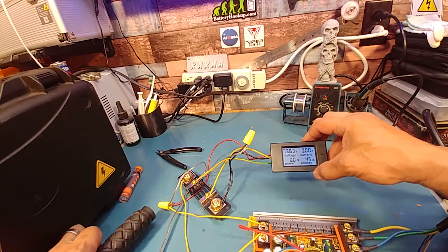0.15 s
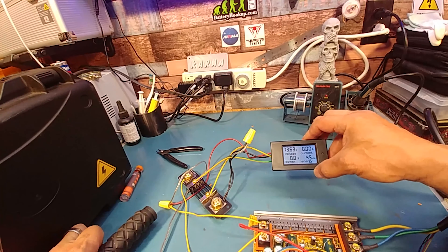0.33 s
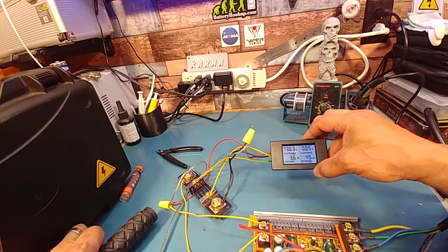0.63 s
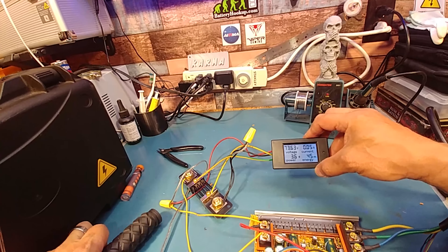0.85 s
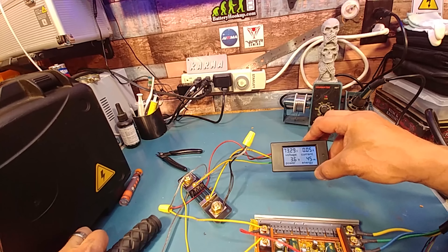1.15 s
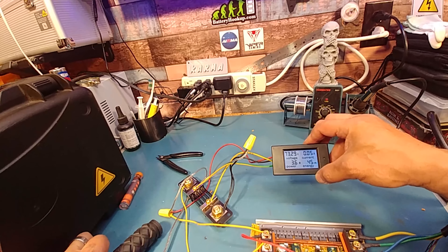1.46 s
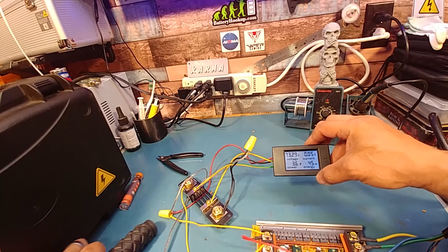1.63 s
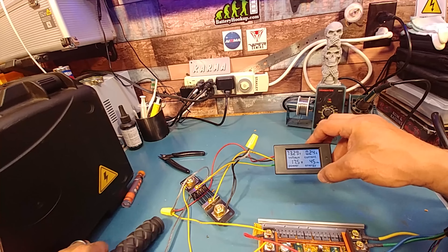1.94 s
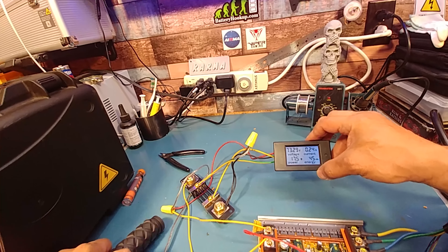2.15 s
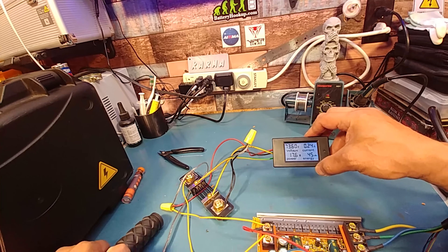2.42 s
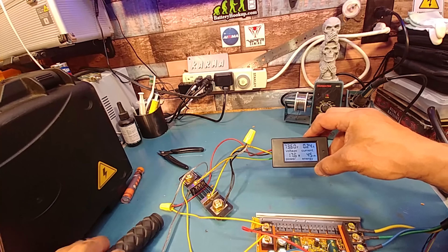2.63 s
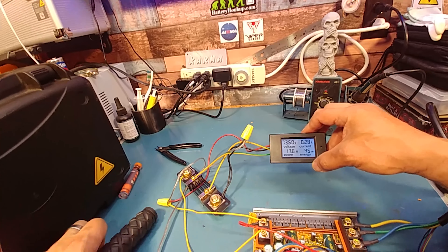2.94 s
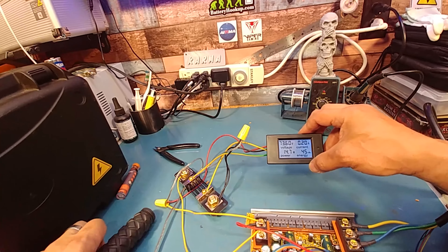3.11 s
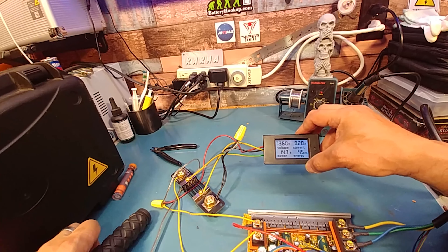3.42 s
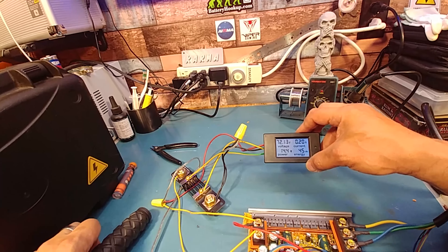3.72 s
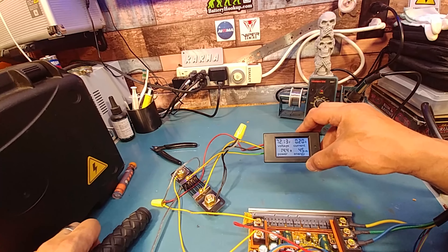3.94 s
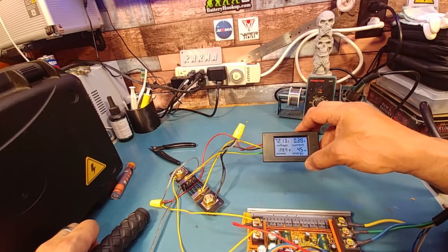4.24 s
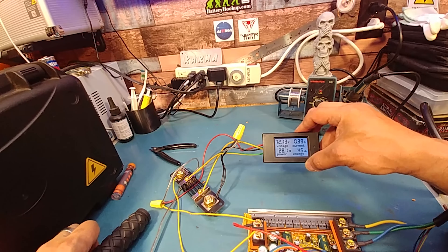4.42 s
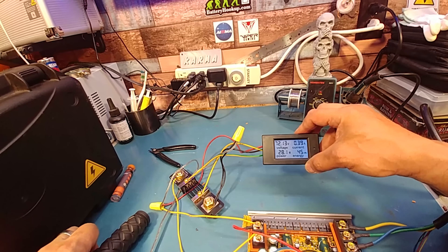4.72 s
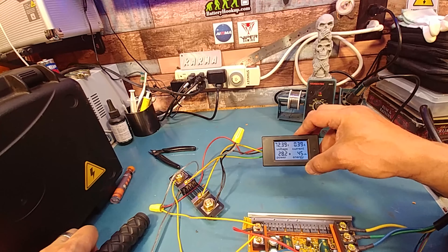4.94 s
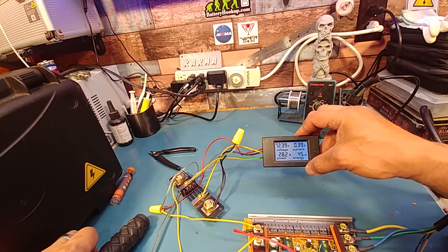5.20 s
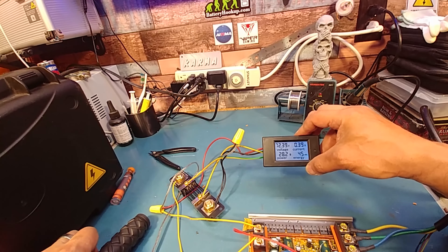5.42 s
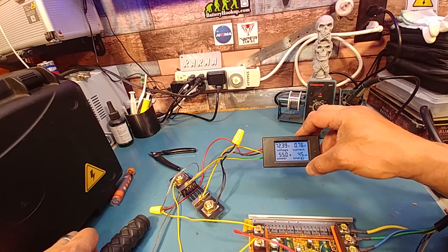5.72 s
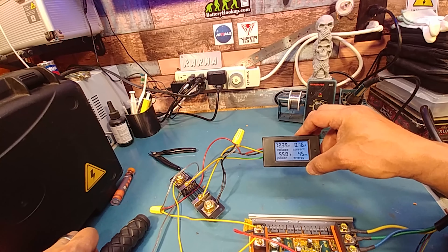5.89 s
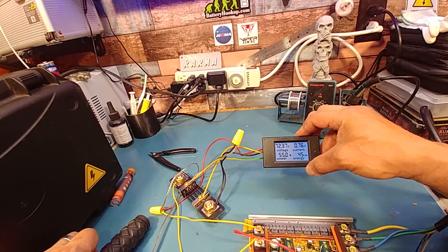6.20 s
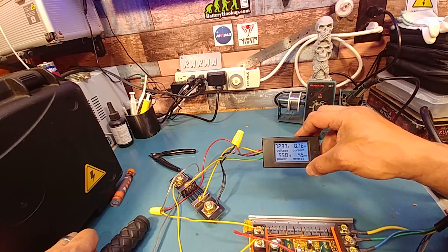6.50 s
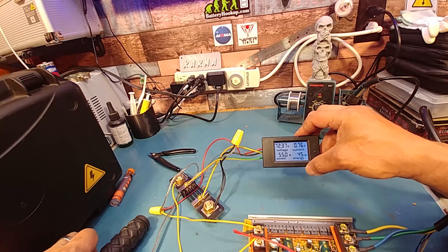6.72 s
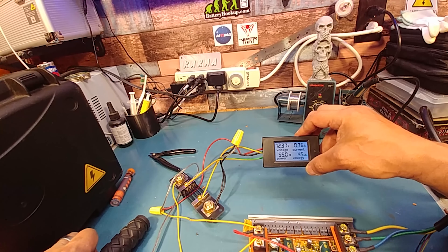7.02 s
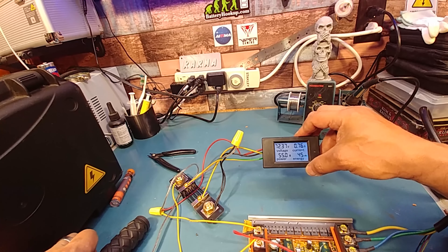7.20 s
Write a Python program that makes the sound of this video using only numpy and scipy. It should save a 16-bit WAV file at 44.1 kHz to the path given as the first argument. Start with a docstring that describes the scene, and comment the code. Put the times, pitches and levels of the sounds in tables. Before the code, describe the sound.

Low room tone opens the scene, heard in close stereo at a workbench. At about 0.5 seconds an electric hub motor gives a small snap and starts turning a lifted wheel, with a groan, a rasping, rising whine and a thin, very high whistle. At 1.5 seconds it steps up in pitch, a deep hum comes through the bench and the stand begins to rattle. At 2.2 seconds the power cuts and the wheel coasts down, with faint ticks and two dull knocks near 2.3 and 2.7 seconds, stopping just after 3 seconds. At 3.3 seconds another snap starts a fast upward sweep with a short shudder. From about 4 seconds the motor holds full speed, a loud, steady, multi-tone whine over a deep hum and the rush of bearings and tyre, until the end at about 7.5 seconds.

```python
"""At a workbench, close on a stereo pair: an electric hub motor spins a lifted wheel through two steps of
throttle, a coast to rest, then full speed. The rotor shakes the bench with a deep hum, magnetic ripple
whines in the housing, the commutation rasps and the controller's switching tone whistles at the top,
with sidebands that follow the speed. Bearings and tyre rush, the stand rattles and the frame knocks,
all over low room tone."""
import sys
import numpy as np
from scipy import signal
from scipy.fft import rfft, irfft, next_fast_len
from scipy.io import wavfile

SR = 44100
rng = np.random.default_rng(int(sys.argv[2]) if len(sys.argv) > 2 else 0)


def store_wav(level_fs):
    """Save 16-bit WAV to argv[1]."""
    pcm = np.round(np.clip(np.atleast_2d(level_fs), -1, 1) * 32767)
    wavfile.write(sys.argv[1], SR, pcm.T.astype(np.int16))


N = 324135

FULL_HZ = 119.35  # top speed; `speed` is the electrical rate in Hz, `turn` counts its cycles
# phase by which the left microphone leads the right: f/Hz, lead/rad
MIC_LEAD = [(30, -.1), (65, -.2), (119, -.3), (300, -.6), (600, -1.4), (1200, -1.6), (2800, -2.2),
            (5000, -1.5), (15000, -1.6)]
# spans in which the controller drives the windings: on t/s, off t/s
THROTTLE_SPANS = [(.53, 2.2), (3.29, 7.5)]
# spectrum of the bench's lowest mode: f/Hz, level/dB
BENCH_SPECTRUM = [(20, -31), (45, -14), (58, -4.5), (66, 2.5), (80, -22), (130, -14.5), (250, -31),
                  (1000, -92)]


def from_db(db):
    """Decibels as amplitude gain."""
    return 10 ** (np.asarray(db) / 20)


def rms_one(x):
    """The signal scaled to rms 1."""
    return x / np.sqrt(np.mean(x ** 2) + 1e-20)


def at_hz(points, hz):
    """A curve read off straight lines over log frequency."""
    knots, values = np.transpose(points)
    return np.interp(np.log(hz + 1e-3), np.log(knots), values)


def resonance(hz, centre_hz, half_width_hz):
    """Gain of a resonance, 1 on top."""
    return 1 / (1 + ((hz - centre_hz) / half_width_hz) ** 2)


def drift(rate_hz):
    """A slow random wander through points of spread 1."""
    count = int(N / SR * rate_hz * 2) + 3
    return np.interp(np.linspace(0, count - 1, N), np.arange(count), rng.standard_normal(count))


def white():
    """Two unrelated white noises."""
    return rng.standard_normal((2, N))


def coloured(pair, colour):
    """Two unrelated signals become one sound at the microphones, shaped by a spectrum; rms 1."""
    # how alike the two microphones sound: f/Hz, coherence/0-1
    coherence = [(100, 0.86), (300, 1), (700, 0.25), (1500, 0.9), (3000, 0.38), (6000, 0.053), (15000, .2)]
    # balance of the pair: f/Hz, left over right/dB
    balance = [(100, 1.5), (300, 0), (700, -3), (1500, -1), (3000, -1), (4500, -3.5), (6000, -4),
               (7600, 1.5), (10000, -.5), (13500, 4), (15500, 2)]
    size = next_fast_len(N + 4096)
    hz = np.arange(size // 2 + 1) * SR / size
    mid, side = rfft(pair, size)
    alike, sides = np.clip(at_hz(coherence, hz), 0, 1), np.array([[1], [-1]])
    both = np.sqrt(1 + alike) * mid + np.sqrt(1 - alike) * side * sides
    both *= from_db(at_hz(colour, hz) + sides * at_hz(balance, hz) / 2)
    both *= np.exp(.5j * sides * at_hz(MIC_LEAD, hz))
    return rms_one(irfft(both, size)[:, :N])


def tone(cycles, hz, pan_db):
    """A sine of rms 1 as the two microphones hear it; positive pan is left."""
    sides = np.array([[1], [-1]])
    angle = 2 * np.pi * (cycles % 1) + sides * at_hz(MIC_LEAD, hz) / 2
    return np.sqrt(2) * rms_one(from_db(sides * pan_db / 2)) * np.sin(angle.astype(np.float32))


def blows(events, colour, crack_t60, tail_t60, tail_db, level_db):
    """Each blow is a short crack into many close modes, then a weaker tail in the room."""
    envelope = np.zeros(N)
    for start, db in events:
        age = np.arange(N - round(start * SR)) / SR
        crack = from_db(-60 * np.minimum(age / crack_t60, 5))
        tail = from_db(tail_db - 60 * np.minimum(age / tail_t60, 5))
        attack = np.minimum(age / 0.0014, 1)
        envelope[N - len(age):] += from_db(db + level_db) * (crack + tail) * attack
    return envelope * coloured(white(), colour)


def room_tone(level_db=-45.5):
    """The steady, low background of the room."""
    # spectrum of the room: f/Hz, level/dB
    spectrum = [(18, -33), (30, -13), (69, 2.5), (182, -18), (299, -9), (389, -15), (622, -11.5),
                (673, -14.5), (1080, -24), (1360, -24.5), (2070, -32.5), (6890, -39.5), (10700, -51.5),
                (13300, -47), (15500, -55)]
    return from_db(level_db) * coloured(white(), spectrum)


def bench_bumps():
    """Soft bumps ring the bench's lowest mode."""
    # bumps: t/s, relative level/dB
    bumps = [(0.0, -40), (0.08, -36), (2.5, -23.5)]
    return blows(bumps, BENCH_SPECTRUM, crack_t60=0.21, tail_t60=.5, tail_db=-13, level_db=1)


def frame_knocks():
    """The frame gives short, dull knocks."""
    # knocks: t/s, relative level/dB
    knocks = [(0.073, -34.5), (0.204, -50), (2.263, -19.5), (2.469, -35), (2.712, -19.5), (2.946, -39)]
    # spectrum of the knocked frame: f/Hz, level/dB
    spectrum = [(88, -39), (150, -9), (415, -3), (782, -12), (1450, -50), (1620, -35), (2070, -51),
                (3440, -30), (6000, -67), (7800, -90), (13200, -120)]
    return blows(knocks, spectrum, crack_t60=0.019, tail_t60=0.25, tail_db=-14, level_db=3)


def current_snaps():
    """The motor snaps as it takes up current."""
    # snaps: t/s, relative level/dB
    snaps = [(0.5304, -26.5), (0.5706, -36), (3.2917, -28.5)]
    # spectrum of a snap: f/Hz, level/dB
    spectrum = [(120, -50), (200, -24), (383, 2), (570, -17), (1150, -32), (1490, -24), (1980, -24),
                (2380, -9), (3350, -4.5), (5070, -23), (8720, -17.5), (10500, -39), (15000, -30)]
    return blows(snaps, spectrum, crack_t60=0.095, tail_t60=0.16, tail_db=-7.5, level_db=-3)


def rotor_speed():
    """The rotor heads for each new speed at a steady rate, then eases in over the last stretch."""
    # speed changes: t/s, target f/Hz, acceleration/(Hz per s), last stretch/Hz, settling time/s
    steps = [(.536, 35.83, 135, 9.2, .174), (1.481, 70.14, 202, 15.1, .173), (2.178, 0, 73, 0, 0),
             (3.335, 30, 178, 0, 0), (3.497, 119.35, 251, 6.7, .07)]
    t, speed = np.arange(N) / SR, np.zeros(N)
    for start, target, rate, stretch, settle_s in steps:
        gap, age = target - speed[round(start * SR)], t - start
        easing_s = age - (abs(gap) - stretch) / rate
        eased = stretch * np.exp(-np.maximum(easing_s, 0) / (settle_s + 1e-9))
        remaining = np.where(easing_s < 0, abs(gap) - rate * age, eased)
        speed = np.where(age < 0, speed, target - np.sign(gap) * remaining)
    return np.maximum(speed, 0)


def driven():
    """1 under throttle, 0 while the wheel runs free."""
    t = np.arange(N) / SR
    return sum(np.clip(np.minimum(t - on, off - t) / 0.02 + .5, 0, 1) for on, off in THROTTLE_SPANS)


def torque(speed, lag_s=0.042, full_load_hz_per_s=200):
    """Acceleration as a share of full load, a little late; negative while the wheel slows."""
    pole = np.exp(-1 / (lag_s * SR))
    return signal.lfilter([1 - pole], [1, -pole], np.gradient(speed) * SR / full_load_hz_per_s)


def current(speed, onset_power, load_db, soft_start_s=0.28, release_s=.03):
    """Gain of a sound made by the current: it swells softly, is louder under load and dies quickly."""
    t, flow = np.arange(N) / SR, 0
    for on, off in THROTTLE_SPANS:
        swell = np.clip((t - on) / soft_start_s, 0, 1) ** onset_power
        flow += swell * np.exp(-np.maximum(t - off, 0) / release_s)
    return flow * from_db(load_db * np.maximum(torque(speed), 0))


def chopping(speed, fade_hz=14):
    """1 at part throttle, 0 at full speed, where the controller hardly chops the current."""
    return np.clip((FULL_HZ - speed) / fade_hz, 0, 1)


def judder():
    """Gain of the motor's short shudder as each step of throttle bites."""
    # shudders: t/s, half length/s, relative level/dB
    shudders = [(.755, 0.025, 0.5), (1.505, 0.051, -9.5), (3.554, 0.043, 4)]
    t = np.arange(N) / SR
    return sum(from_db(db) * np.exp(-np.minimum(((t - centre) / half_s) ** 2, 50))
               for centre, half_s, db in shudders)


def chatter(turn, tick_gain, throb, count=30):
    """Ticks at fixed rotor angles repeat every cycle in the housing, over hiss that throbs in step."""
    ticks = np.zeros((2, N))
    for channel in ticks:
        for angle, sign in zip(rng.random(count), rng.choice([-1, 1], count)):
            at = np.flatnonzero(np.diff(np.floor(turn + angle)) > 0)
            step = turn[at + 1] - turn[at]
            overshoot = ((turn[at + 1] + angle) % 1) / step  # shares the tick between two samples
            size = sign / np.sqrt(step + 1e-4)
            channel[at] += size * overshoot
            channel[at + 1] += size * (1 - overshoot)
    # the shell passes only the treble of the ticks, and its dispersion spreads each over a few ms
    hz = np.arange(N + 1) * SR / (2 * N)
    shell = np.exp(-1j * np.pi * (hz / 1100) ** 2) / np.sqrt(1 + (1500 / (hz + 1)) ** 6)
    ticks = irfft(rfft(ticks, 2 * N) * shell, 2 * N)[:, :N]
    pulsing = 1 + throb * (np.cos(2 * np.pi * turn) + np.cos(4 * np.pi * turn))
    return tick_gain * rms_one(ticks) + rms_one(pulsing * white())


def cogging_groan(speed, turn, level_db=-27, roughness=0.35, flutter_db=3):
    """At a crawl, speeding up or slowing, the cogging orders ring the bench and the frame in turn."""
    # cogging: order, relative level/dB
    cogging = [(9, -8), (12, -4), (24, 0), (36, -9)]
    frame, excitation = 0, 0
    for order, db in cogging:
        hz = order * speed
        gain = from_db(level_db + db) * (resonance(hz, 380, 85) + from_db(-15) * resonance(hz, 880, 90))
        frame += gain * tone(order * turn, hz, pan_db=5.5) * from_db(flutter_db * drift(35))
        excitation += gain
    bench = from_db(-31) * resonance(12 * speed, 62, 30) * tone(12 * turn, 12 * speed, pan_db=1.4)
    strain = np.sqrt(np.abs(torque(speed))) * np.clip(speed / 4, 0, 1)
    # f/Hz, level/dB
    scrape_spectrum = [(100, -20), (250, -4), (380, 15), (550, -4.5), (900, -2), (1300, -58), (4000, -54)]
    scrape_gain = roughness * strain * excitation + from_db(-26) * judder()
    return strain * (frame + bench) + scrape_gain * coloured(white(), scrape_spectrum)


def bench_hum(speed, turn, waver_db=0.2):
    """The rotor shakes the bench once a cycle; the bench's own low mode rumbles along."""
    # how strongly the bench hums at each speed: f/Hz, level/dB
    response = [(20, -62), (35, -42), (44, -31), (52, -25), (57, -15.5), (60, -7.5), (65, -4.5), (70, -5.5),
                (81, -3.5), (91, -19), (101, -7), (119, -6)]
    shake = from_db(at_hz(response, speed) + waver_db * drift(7)) * tone(turn, speed, pan_db=1.3)
    rumble_gain = from_db(-37) * (speed / FULL_HZ) ** 0.15 + from_db(-32) * judder()
    return shake * np.clip(speed / 20, 0, 1) + rumble_gain * coloured(white(), BENCH_SPECTRUM)


def ripple_whine(speed, turn):
    """Each order of the magnetic ripple swells as it sweeps through a resonance of the housing."""
    # ripple, six commutations a cycle: order, relative level/dB, left over right/dB
    ripple = [(6, 0, -3), (12, 4, -3), (18, -3, -4), (24, 3, -4), (30, -7, -1), (36, -11, 0), (42, 1.5, -9),
              (48, -2, -3), (54, -9, -3), (60, 2, -2), (66, -7, 2), (72, -11, 0), (78, -3, 2), (84, -1, 5),
              (90, -8, 0), (96, 2, 0), (102, -2, 0), (114, -5, -3), (120, -6, -5)]
    # response of the housing: f/Hz, level/dB
    housing = [(40, -70), (200, -46), (430, -41), (600, -42), (715, -37), (790, -47), (1250, -44),
               (1430, -42), (1510, -49), (1660, -41), (1850, -46), (2100, -38), (2400, -25), (2700, -26),
               (2870, -29.5), (3400, -29.5), (3700, -33), (4150, -34), (5000, -47), (7200, -51),
               (10000, -62), (15000, -64)]
    whine, throttle = 0, driven()
    waver_db = 1.8 + 2 * (1 - throttle)
    for order, db, pan_db in ripple:
        gain = from_db(db + at_hz(housing, order * speed) + waver_db * drift(26))
        if order in (12, 24):  # the cogging orders grow with speed
            gain *= (speed / FULL_HZ) ** .8
        if order >= 42:  # the high orders come mostly from the current and fade when it stops
            gain *= 0.12 + 0.56 * throttle
        # the shell delays each order differently, so they sing rather than click
        whine += gain * tone(order * turn + rng.random(), order * speed, pan_db)
    powered = from_db(-1) * current(speed, onset_power=2, load_db=5.5) * (speed / FULL_HZ) ** .2
    coasting = from_db(-4) * (1 - throttle) * np.clip(speed / 50, 0, 1) ** 3
    return whine * (powered + coasting)


def commutation_rasp(speed, turn, scrape_peak_hz=69):
    """Chopped current rattles the housing near 3 kHz; a light scrape peaks at middling speed."""
    # spectrum of the rattling housing: f/Hz, level/dB
    rasp_spectrum = [(1000, -31), (1900, -14), (2300, -9), (3100, 2), (3700, -6.5), (4600, -11.5),
                     (6500, -20.5), (7800, -18.5), (8100, -10), (8400, -15.5), (10000, -29), (12000, -40)]
    # spectrum of the scrape: f/Hz, level/dB
    scrape_spectrum = [(2600, -35), (3200, -3), (3450, 2), (3800, 1), (4200, -9), (4700, -7), (5050, 5.5),
                       (5400, -10), (7000, -47)]
    chopped = from_db(-32.5) * current(speed, onset_power=2.28, load_db=7) * chopping(speed)
    rasp = coloured(chatter(turn, tick_gain=1.5, throb=.1, count=40), rasp_spectrum)
    scrape_gain = from_db(-38) * np.minimum(speed / scrape_peak_hz, scrape_peak_hz / (speed + 1)) ** 2.9
    return (chopped + from_db(-27) * judder()) * rasp + scrape_gain * coloured(white(), scrape_spectrum)


def switching_whistle(speed, turn, carrier_hz=15651, level_db=-42, full_speed_db=-5, fall_db=8):
    """The controller's carrier, with sidebands below it at multiples of three times the electrical rate."""
    # spectrum of the hiss at part throttle: f/Hz, level/dB
    hiss_spectrum = [(9000, -60), (11500, -27), (13000, -7), (14500, -3), (15400, -2), (15700, -9),
                     (15900, -35)]
    part_throttle = chopping(speed)
    carrier_cycles = carrier_hz * np.arange(N) / SR
    whistle = from_db(4.5) * tone(carrier_cycles, carrier_hz, pan_db=4.5)
    for k, order in enumerate((3, 6, 12, 18, 24, 30, 36)):
        db = -11 if k == 0 else -5 + 6 * part_throttle - fall_db * (k - 1)
        sideband = tone(carrier_cycles - order * turn, carrier_hz, pan_db=10)
        whistle += from_db(db + 2 * drift(15)) * sideband
    hiss = from_db(-0.5) * part_throttle * coloured(chatter(turn, tick_gain=0.78, throb=.3), hiss_spectrum)
    gain = from_db(level_db + full_speed_db * (1 - part_throttle))
    return gain * current(speed, onset_power=1.9, load_db=6) * (whistle + hiss)


def wheel_rush(speed, turn, dull_hz=1800, level_db=-20):
    """Bearings and tyre rush; the level rises and the treble opens up with speed."""
    # spectrum of the rush at full speed: f/Hz, level/dB
    spectrum = [(30, -6.5), (130, 0.5), (200, -3.5), (400, -2), (850, 2), (1100, -4.5), (1450, -3),
                (2000, -4), (2600, -1.5), (3600, -7.5), (4400, -6), (6800, -10), (7700, -9.5), (9000, -20),
                (10500, -29), (11700, -27), (13500, -16.5), (15600, -24.5)]
    bright = coloured(chatter(turn, tick_gain=0.4, throb=0.15), spectrum)
    lowpass = signal.butter(2, dull_hz, fs=SR, output="sos")
    forward = signal.sosfilt(lowpass, bright)
    dull = signal.sosfilt(lowpass, forward[:, ::-1])[:, ::-1]  # both ways, to stay in phase
    opening = np.clip(speed / FULL_HZ, 0, 1) ** 1.5
    gain = from_db(level_db) * (speed / FULL_HZ) ** 1.98 + from_db(-31) * judder()
    return gain * (dull + opening * (bright - dull))


def magnet_buzz(speed, turn, waver_db=0.75, coast_db=-10):
    """Uneven magnetic pull adds orders between those of the ripple, growing with speed and drive."""
    # buzz: order, level at full speed/dB, left over right/dB, growth/(dB per doubling of speed)
    orders = [(2, -28, -1, 5), (2.5, -33, 0, 20), (3, -25, -1, 18), (4, -37, 4, 6), (5, -23, -8, 4),
              (7, -39, -6, 15), (8, -41, 0, 13), (9, -33, -7, 14), (9.5, -39, -1, 20), (10, -34, 2, 16),
              (11, -35, -3, 16), (21, -42, -2, 16), (23, -46, -4, 14), (25, -46, 5, 14), (27, -41, 0, 14),
              (33, -44, -8, 14), (37, -44, -8, 14)]
    # low modes that single orders meet: order, f/Hz, half width/Hz, relative level/dB
    low_modes = [(2, 121, 6, 7), (3, 208, 4, 10)]
    buzz, octaves = 0, np.log2(speed / FULL_HZ + 1e-6)
    drive = from_db(coast_db * (1 - driven())) * np.clip(speed / 69, 0, 1) ** 4.7
    for order, db, pan_db, growth_db in orders:
        gain = from_db(db + growth_db * octaves + waver_db * drift(16))
        ringing = sum(from_db(mode_db) * resonance(order * speed, hz, half_width)
                      for mode_order, hz, half_width, mode_db in low_modes if mode_order == order)
        buzz += gain * (drive + ringing) * tone(order * turn + rng.random(), order * speed, pan_db)
    return buzz


def stand_rattle(turn):
    """Loose contacts of the stand, knocked on every cycle while the wheel shakes it."""
    # swell and fade of the rattle: t/s, level/dB
    swell = [(1.4, -90), (1.65, -38), (2.2, -24.5), (2.3, -29), (2.6, -43.5), (2.8, -90)]
    # f/Hz, level/dB
    spectrum = [(70, -28), (130, 1.5), (250, 4.5), (380, -1.0), (520, -15.5), (900, -9), (1400, -16.5),
                (2200, -29), (5000, -54)]
    gain = from_db(np.interp(np.arange(N) / SR, *np.transpose(swell)))
    return gain * coloured(chatter(turn, tick_gain=0.27, throb=0.4), spectrum)


def coasting_ticks():
    """Light, bright ticks as the wheel slows."""
    # ticks: t/s, relative level/dB
    ticks = [(2.2009, -29), (2.392, -38), (2.4844, -44), (2.903, -38)]
    # spectrum of a tick: f/Hz, level/dB
    spectrum = [(3000, -25), (6000, -3), (8000, 2), (10500, -12), (12500, -5), (15000, -12)]
    return blows(ticks, spectrum, crack_t60=0.034, tail_t60=.12, tail_db=-9, level_db=-6.5)


def scene():
    """Motor, stand, bench and room as they reach the pair."""
    speed = rotor_speed()
    turn = np.cumsum(speed * (1 + 0.00032 * drift(20))) / SR
    motor = bench_hum(speed, turn) + ripple_whine(speed, turn)
    motor += magnet_buzz(speed, turn) + cogging_groan(speed, turn)
    noise = commutation_rasp(speed, turn) + wheel_rush(speed, turn) + stand_rattle(turn)
    impacts = current_snaps() + frame_knocks() + coasting_ticks() + bench_bumps()
    return motor + noise + impacts + room_tone() + switching_whistle(speed, turn)


def record(dry):
    """The loudest peaks flatten at full scale, and the top is cut at 15.9 kHz."""
    lowpass = signal.ellip(12, .1, 80, 15900, fs=SR, output="sos")
    return signal.sosfilt(lowpass, np.clip(dry, -1, 1))


dry = scene()
out = record(dry)
store_wav(out)
```